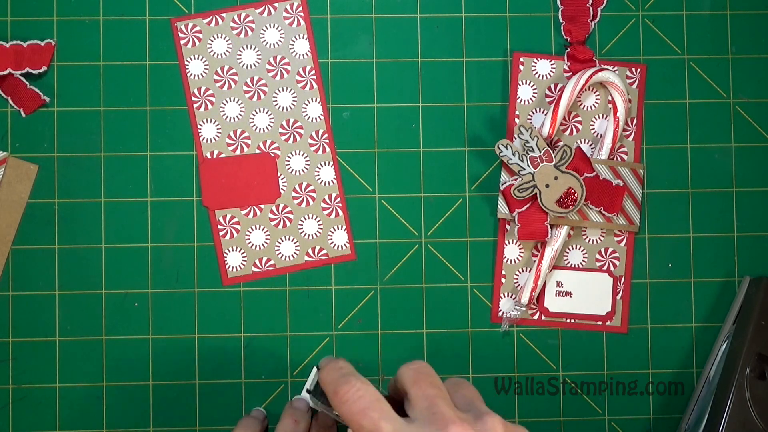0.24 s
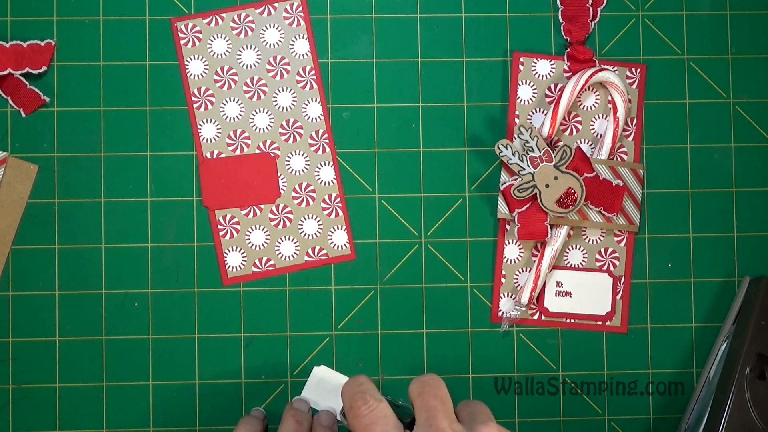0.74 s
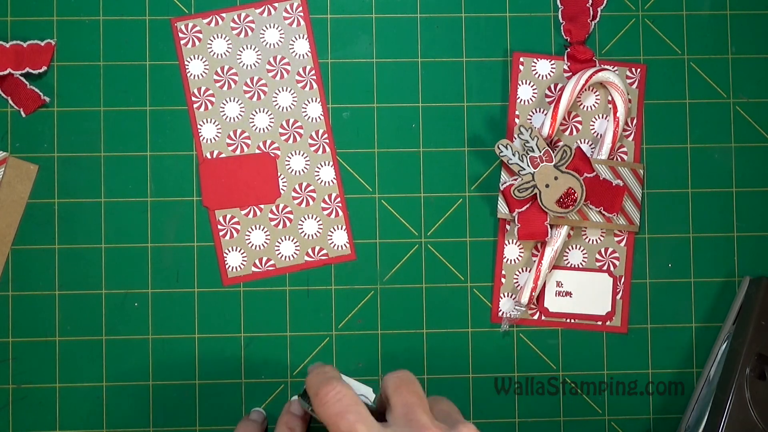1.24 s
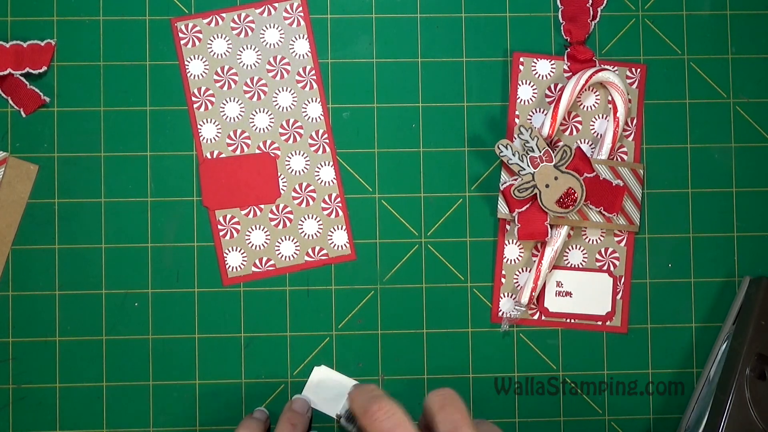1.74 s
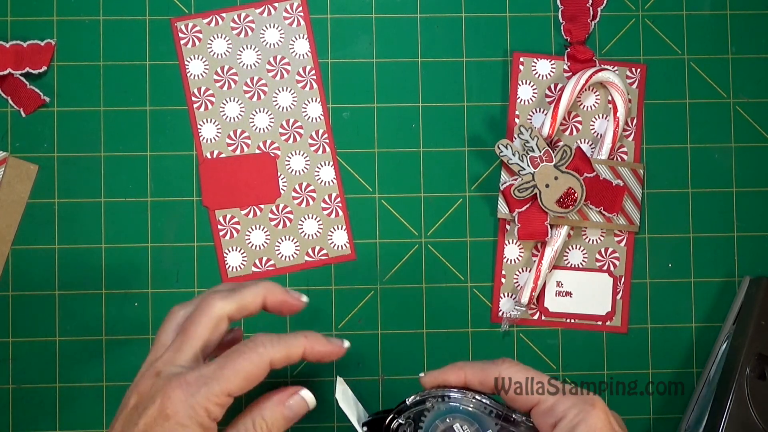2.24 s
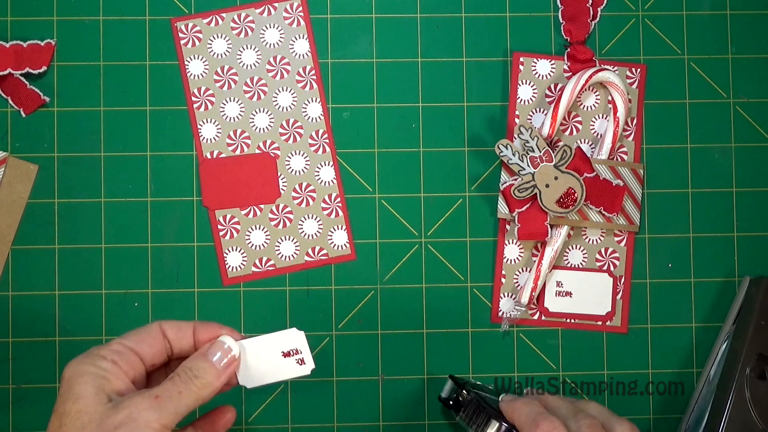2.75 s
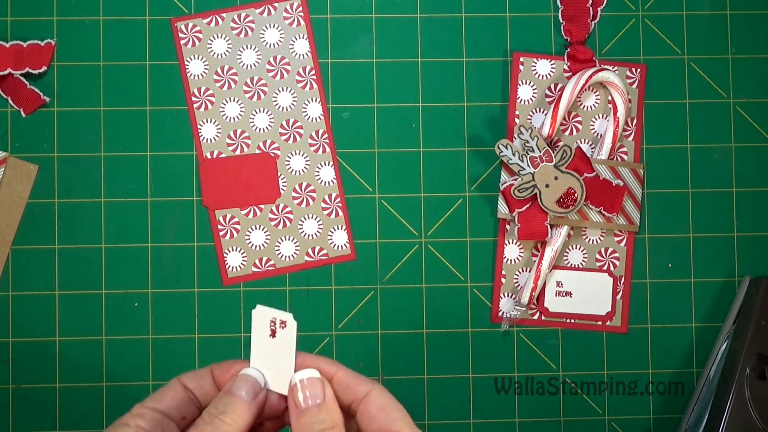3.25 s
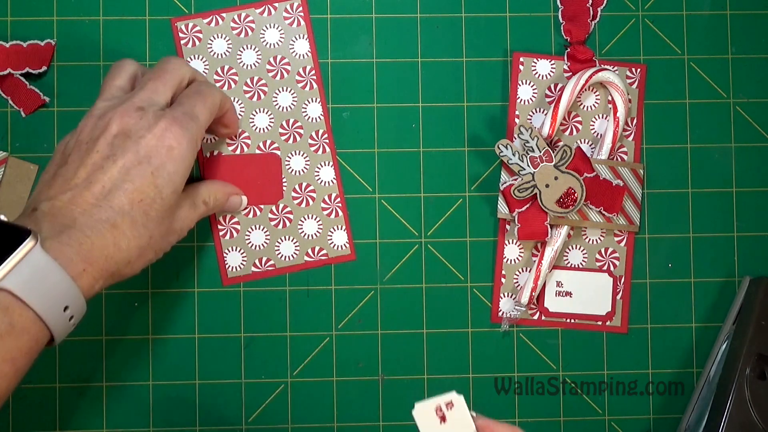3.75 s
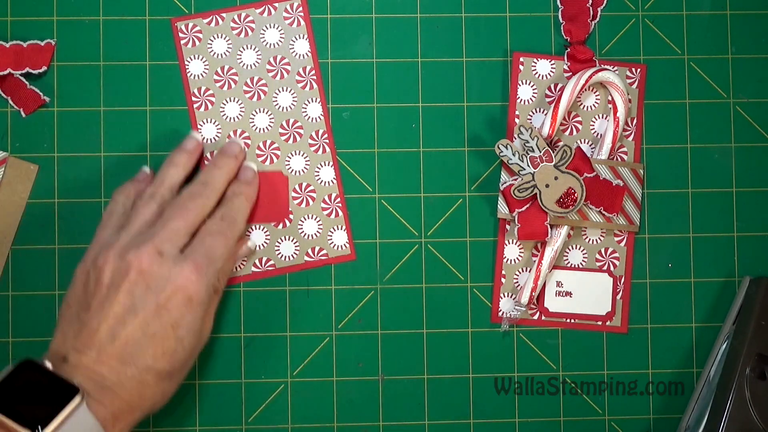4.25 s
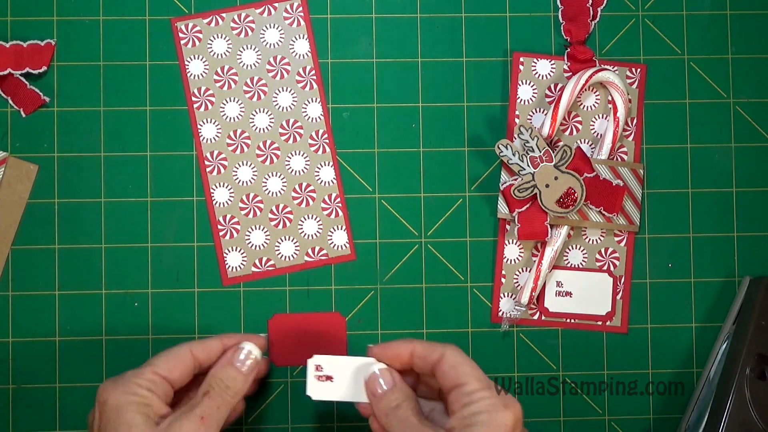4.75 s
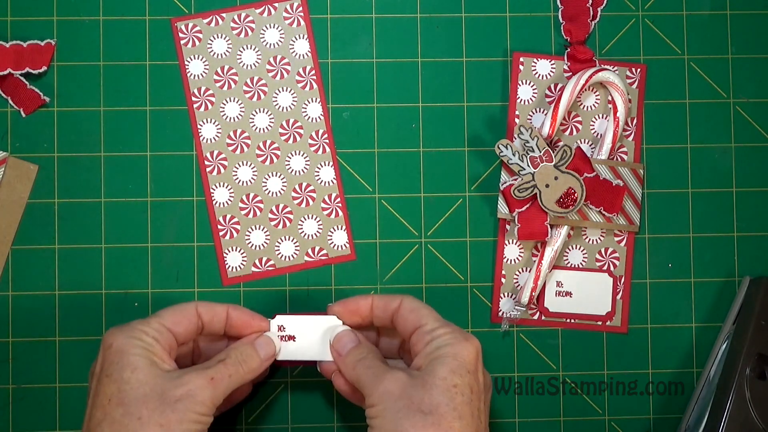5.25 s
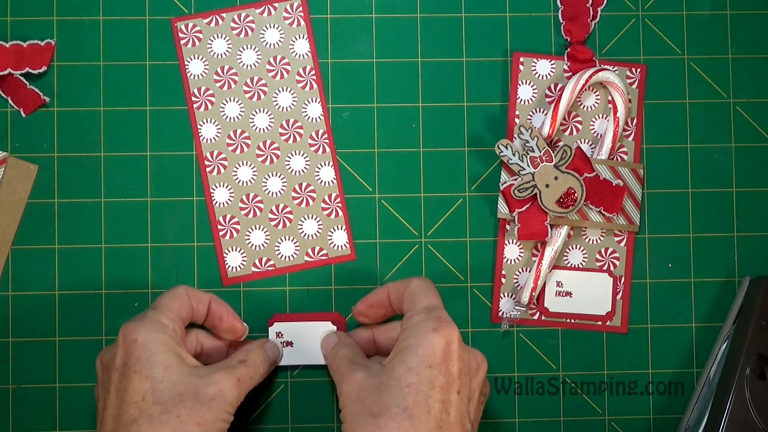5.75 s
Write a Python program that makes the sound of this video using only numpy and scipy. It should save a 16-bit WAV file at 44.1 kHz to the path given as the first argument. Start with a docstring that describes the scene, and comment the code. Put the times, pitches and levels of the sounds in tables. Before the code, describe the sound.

Close up at a craft table, a plastic tape runner clicks, gives two very short ratcheting rasps, the second faster, then rattles sharply as it is handled and laid down. Afterwards fingertips tap, cardstock hisses briefly over the mat, and small card edges tick. Small room with low noise and hum, close stereo microphone, loudest clicks clipped.

```python
"""A plastic tape runner is drawn twice over a small card tag, its ratchet rasping faster as the hand speeds up;
laid down, it rattles on the craft table. Fingers tap, slide cardstock over the mat and press the tag onto it.
Contacts are noise bursts through body resonances, blows are decaying sines, rubs are filtered noise.
All is heard close up in stereo, the loudest clicks clipped; behind lies a small room with noise, hum and a faint warble."""
import sys
import numpy as np
from scipy import signal
from scipy.fft import rfft, irfft
from scipy.io import wavfile
from scipy.ndimage import uniform_filter1d

SR = 44100
rng = np.random.default_rng(int(sys.argv[2]) if len(sys.argv) > 2 else 0)


def unload_audio(sound):
    """Save the sound as a 16-bit wav file, at the path given as the first command line argument."""
    columns = np.transpose(np.atleast_2d(sound))
    # keep every value between -1 and 1, then stretch to whole-number steps
    steps = np.round(np.clip(columns, -1, 1) * 32767)
    wavfile.write(sys.argv[1], SR, steps.astype(np.int16))


N = 264226
T = np.arange(N) / SR

# Levels of clicks and blows are before the gain of their layer; tilts count from 1 kHz up.
# Clear clicks and knocks of the runner's case:
# (time [s], level [dB], chatter length [s], tilt [dB per octave], struck band [Hz])
CASE_CLICKS = [(0.1202, -20, 0.0063, -1.5, 3220), (0.4306, -9.5, 0.007, -0.5, 1730),
               (0.4394, -3.5, 0.0041, 1, 5050), (0.5366, -16, 0.0047, -2.5, 6060),
               (0.569, -8.5, 0.0026, -3, 5100), (0.907, -24, 0.0021, 7, 1510),
               (0.9233, -4.5, 0.0026, 8, 1560), (1.0616, -9, 0.0044, 3, 4370),
               (1.131, -19, 0.0042, -4, 3120), (1.224, -23, 0.016, -0.5, 1980),
               (1.3183, -11.5, 0.0052, 3.5, 4370), (1.3241, -6, 0.0036, 1, 4470),
               (1.7836, -22, 0.004, -1, 12210), (1.8324, -19.5, 0.0062, 4, 1820),
               (1.8486, 0.5, 0.0022, 8.5, 1480), (1.874, -23.5, 0.015, -9.5, 2450),
               (1.9157, -19, 0.0075, -2, 5070), (2.3294, -19, 0.0031, 0.5, 2760),
               (2.478, 1, 0.0026, 4.5, 2650), (2.496, -13, 0.01, -2, 7600),
               (2.671, -20.5, 0.0054, -0.5, 4350), (2.702, 0.5, 0.0024, 0, 10000),
               (2.801, -6.5, 0.0017, 3, 6660), (2.844, 1, 0.0065, -1.5, 11200),
               (2.921, 1, 0.0067, -2, 10900), (2.936, -5.5, 0.0073, 0, 4370),
               (3.0163, 4.5, 0.0032, 0, 1790), (3.051, -13.5, 0.0083, -2.5, 4640),
               (3.115, -16.5, 0.008, 0, 2010), (3.1747, -10, 0.0023, -8.5, 3600),
               (3.1794, 2.5, 0.0047, 0.3, 4000), (3.2643, 0, 0.0055, -0.5, 1880),
               (3.308, -13.5, 0.0063, 0, 2180), (3.3375, -9, 0.0062, -1.5, 10900),
               (3.377, -19, 0.0034, 3, 2000), (3.385, -12, 0.011, -0.5, 1930),
               (3.425, -16.5, 0.0074, 2, 1900), (3.481, -11, 0.0067, -1, 1900),
               (3.501, -20, 0.008, -2, 2580)]
# Fingernails and card edges: (time [s], level [dB], chatter length [s], tilt [dB per octave], struck band [Hz])
CARD_TICKS = [(3.7773, -15.5, 0.0032, 5, 1320), (3.8984, -19, 0.0023, 1, 1400),
              (4.1792, -27.5, 0.0033, 4.5, 1520), (4.2296, -30, 0.0065, 9, 1530),
              (4.767, -12, 0.0022, 0, 1710), (4.9877, -17, 0.0021, 2.5, 3400),
              (5.0829, -15.5, 0.0032, 1, 2700), (5.0916, -23, 0.0052, 1, 6770),
              (5.1659, -14, 0.0047, 2, 3340), (5.182, -18, 0.0021, 3.5, 2570),
              (5.295, -25.5, 0.0032, -0.5, 2600), (5.5018, -23, 0.0037, 6, 2800)]
# Blows that reach the table top; low thud for a fingertip, high for plastic:
# (time [s], level [dB], thud pitch [Hz])
TABLE_BLOWS = [(0.432, -5, 234), (1.322, -11.5, 240), (1.784, -9.5, 282), (2.845, -7.5, 285),
               (2.92, -8.5, 260), (2.937, -13, 285), (3.018, -15.5, 231), (3.049, -16.5, 287),
               (3.179, -12, 123), (3.338, -16.5, 540), (3.776, -12, 124), (3.899, -20, 120),
               (4.181, -15, 116), (4.767, -15, 298)]
# Table top modes, before scatter from blow to blow: (frequency [Hz], level [dB], decay by 60 dB [s])
TABLE_MODES = [(90, -31, 0.12), (130, 4, 0.079), (175.6, -1, 0.24), (234.8, 2.5, 0.13), (290, 1, 0.087),
               (390, -6, 0.19), (504, -19, 0.092), (599, -3.5, 0.061)]
# Speed of the card pushed over the mat, given as loudness: (time [s], level [dB])
CARD_SPEED = [(4.28, -57), (4.294, -27), (4.338, -18), (4.46, -19), (4.536, -11), (4.572, -17.5),
              (4.61, -17.5), (4.66, -44)]
# Light brushes and scuffs of skin, card and plastic: (time [s], length [s], level [dB], centre [Hz])
BRUSHES = [(0.029, 0.061, -31.5, 9200), (0.585, 0.0078, -17, 10000), (0.648, 0.017, -10.5, 10000),
           (1.13, 0.093, -37, 8800), (1.105, 0.15, -36.5, 517), (2.895, 0.066, -21.5, 8000),
           (3.114, 0.054, -27, 1960), (3.845, 0.09, -35.5, 1400), (4.768, 0.062, -23.5, 1840),
           (4.77, 0.031, -25.5, 517), (5.058, 0.019, -28.5, 6740), (5.216, 0.056, -33.5, 7500),
           (5.439, 0.05, -35, 8600)]
# Ratchet spectrum: (frequency [Hz], level [dB])
RATCHET_COLOUR = [(50, -44), (200, -23), (800, -26.5), (1200, -11.5), (1650, -5), (2400, -10.5), (3500, -3),
                  (5200, -1), (6600, -2), (9000, 0.5), (12000, -5), (16000, -14)]
# Case spectrum: (frequency [Hz], level [dB])
CASE_COLOUR = [(50, -28), (220, -9.5), (800, -13.5), (1250, -7.5), (1800, 0), (2500, -3.5), (3500, -1.5),
               (5500, -5), (8000, 3), (10200, 3), (12000, -8.5), (16000, -22)]
# Card spectrum: (frequency [Hz], level [dB])
CARD_COLOUR = [(50, -28), (200, -13), (800, -3.5), (1600, 5), (2700, -3), (4500, -7.5), (7000, -0.5),
               (10000, -4), (16000, -28)]
# Spectrum of card rubbing the mat: (frequency [Hz], level [dB])
MAT_COLOUR = [(530, -33), (900, -22), (1390, -20.5), (1740, -3.5), (1990, -16), (2360, -21), (3380, -12.5),
              (4010, -16), (6030, -9), (6800, -9), (7580, -4.5), (9200, -2), (13400, -13.5), (16000, -28)]
# Room noise spectrum: (frequency [Hz], level [dB])
ROOM_COLOUR = [(25, -7.5), (45, -2.5), (90, -2), (150, 1), (256, -3.5), (373, -2), (700, -6.5),
               (1190, -8.5), (1560, -7.5), (2350, -12.5), (2900, -13), (4000, -16), (14400, -21),
               (16000, -29)]
# Resonances of the runner's shell: (frequency [Hz], width [Hz], level [dB])
SHELL_MODES = [(1640, 145, 6), (2062, 45, 4), (2960, 70, 4), (3720, 82, 5), (4490, 220, 2),
               (5130, 580, 4.5), (9230, 270, 4)]
# Room noise before its flicker: (time [s], level [dB])
ROOM_LEVEL = [(0, -35), (0.4, -35.5), (0.9, -37.5), (2.03, -37.5), (2.4, -33.5), (3.65, -38.5),
              (4.2, -36.5), (5.99, -32)]
# Mains hum before its slow drift in pitch: (frequency [Hz], level [dB])
HUM = [(59.6, -58), (119.5, -53), (178.5, -50.5)]
# Strokes of the runner: (start [s], tooth rate at the start [Hz], at full speed [Hz], while braking [Hz],
# level [dB], fade over the stroke [dB], first struck band [Hz], last struck band [Hz])
STROKES = [(0.5749, 50.16, 55.3, 46.5, -3.5, -0.7, 3600, 4560),
           (1.5274, 63.35, 91, 53.5, -4, -2, 6700, 2600)]
# Spells when the hand shifts its grip and loose parts tick: (start [s], end [s], level [dB])
HANDLING = [(0.822, 1.25, -31.5), (1.834, 1.92, -16), (2.127, 2.22, -29), (2.529, 2.83, -24),
            (2.848, 3.54, -22.5)]


def undb(db):
    """Decibels to gain."""
    return 10 ** (np.asarray(db) / 20)


def curve(rows):
    """Gain along a (time [s], level [dB]) curve."""
    return undb(np.interp(T, *np.transpose(rows)))


def unit(x):
    """Scale to rms 1."""
    return x / np.sqrt(np.mean(x ** 2))


def freqs(x):
    """Frequencies of the spectrum of x, at least 1 Hz."""
    return np.maximum(np.fft.rfftfreq(x.shape[-1], 1 / SR), 1)


def colour(f, points):
    """Level in dB at f, on straight lines over a log-frequency axis."""
    hz, db = np.transpose(points)
    return np.interp(np.log(f), np.log(hz), db)


def bump(f, hz, width):
    """Bell of height 1 around a resonance."""
    return 1 / (1 + (2 * (f - hz) / width) ** 2)


def ring(x, db):
    """Causal minimum-phase filter with the given dB at each frequency."""
    cepstrum = irfft(db * np.log(10) / 20, len(x))
    # folding the cepstrum forward makes the filter ring only after the blow
    cepstrum[1:len(x) // 2] *= 2
    cepstrum[len(x) // 2 + 1:] = 0
    return irfft(rfft(x) * np.exp(rfft(cepstrum)), len(x))


def add(out, s, x):
    """Mix x into out at time s."""
    i = max(int(s * SR), 0)
    out[i:i + len(x)] += x[:N - i]


def walk(rate):
    """Smooth random drift with a spread near 1 and the given number of knots per second."""
    knots = np.arange(0, T[-1] + 1, 1 / rate)
    return 1.22 * np.interp(T, knots, rng.standard_normal(len(knots)))


def spread(mid, side, points):
    """Left and right from a middle signal and an unrelated one, weighted by (frequency [Hz], level [dB])."""
    side = irfft(rfft(side) * undb(colour(freqs(side), points)), len(side))
    return np.array([mid + side, mid - side])


def background(flicker_db=1.4):
    """Flickering room noise, widest in the middle register, with mains hum that drifts slightly in pitch."""
    shape = colour(freqs(T), ROOM_COLOUR)
    mid, side = (unit(ring(rng.standard_normal(N), shape)) for _ in range(2))
    width = [(60, -27.0), (150, -15.5), (280, -10.5), (500, -5.5), (1200, -3.5), (4000, -4.5), (12000, -45.0)]
    air = spread(mid, side, width) * curve(ROOM_LEVEL) * undb(flicker_db * walk(22.036))
    hum = 0
    for hz, db in HUM:
        turns = np.cumsum(hz * (1 + 0.0041 * walk(2.88))) / SR
        hum = hum + undb(db) * np.sqrt(2) * np.sin(2 * np.pi * turns)
    return air + hum


def whine(rate_hz=28.0, low_hz=2580, high_hz=3060, tone_hz=2985, peak_s=5.5, slope_db_per_s=4.5):
    """A thin tone, joined by an upward chirp about 28 times a second; both slowly swell and sink."""
    tone_db, warble_db = -47, -42.5  # at their loudest
    tone_start_s, warble_start_s, fade_s = 3.66, 3.94, 0.15
    swell = undb(-slope_db_per_s * np.abs(T - peak_s))
    tone_gain = undb(tone_db) * np.clip((T - tone_start_s) / fade_s, 0, 1)
    chirp_gain = undb(warble_db) * np.clip((T - warble_start_s) / fade_s, 0, 1)
    turn = np.cumsum(rate_hz * (1 + .01 * walk(5.2))) / SR % 1
    # the pitch climbs in the middle third of each turn
    hz = low_hz + (high_hz - low_hz) * np.clip(3 * turn - 1, 0, 1) + 75 * walk(400)
    pulse = np.sin(np.pi * turn) ** 4 * undb(walk(200))
    chirp = np.sin(2 * np.pi * np.cumsum(hz) / SR) * pulse
    tone = np.sin(2 * np.pi * np.cumsum(tone_hz + 12 * walk(60)) / SR)
    return swell * (chirp_gain * unit(chirp) + tone_gain * unit(tone))


def room(x, early_db=-13, early_s=0.0082, late_db=-14, t60_s=0.52, treble_t60_s=0.16, size=24000):
    """Quick reflections off the desk, then the short tail of a small room, its treble dying first."""
    t = np.arange(size) / SR
    dull = 1 / (1 + (freqs(t) / 4200) ** 2)
    responses = []
    for noise in rng.standard_normal((2, size)):
        low = irfft(rfft(noise) * dull, size)
        early = noise * np.exp(-t / early_s) * (t > .002)
        low_tail = low * np.exp(-np.log(1000) * t / t60_s)
        treble_tail = (noise - low) * np.exp(-np.log(1000) * t / treble_t60_s)
        late = (low_tail + treble_tail) * np.clip(t / 0.024, 0, 1)
        early = undb(early_db) * early / np.linalg.norm(early)
        responses.append(early + undb(late_db) * late / np.linalg.norm(late))
    width = [(100, -42), (250, -68), (500, -29), (1500, -11), (4000, -13.5), (10000, -40)]
    pair = spread(*responses, width)
    return x + signal.fftconvolve(x[None], pair, axes=1)[:, :N]


def treble_width(x, width_s=4.5e-6):
    """A slight left-right difference in near sound that grows toward the treble."""
    side = np.gradient(x) * SR * width_s / 2
    return np.array([side, -side])


def brushes(rough_db=2, focus_db=14, focus=0.12, size=16384):
    """Short uneven rubs of noise, each with one broad resonance."""
    out, t = np.zeros(N), np.arange(size) / SR
    f = freqs(t)
    for s, length, db, hz in BRUSHES:
        friction = rng.standard_normal(size) * undb(rough_db * np.tanh(walk(439)[:size]))
        edges = 10 * np.log10((1 + (f / hz / 2) ** 3) * (1 + (150 / f) ** 4))
        rub = unit(ring(friction, focus_db * bump(f, hz, focus * hz + 600) - edges))
        stroke = np.sqrt(np.abs(np.sin(np.pi * np.minimum(t / length, 1))))
        add(out, s, undb(db) * rub * stroke)
    return out


def slide(rough_db=1.0, squeak_db=5, squeak_hz=8700):
    """Card fibres hiss over the mat; the faster they go, the more one band sings."""
    speed = curve(CARD_SPEED)
    friction = rng.standard_normal(N) * undb(rough_db * walk(220))
    f = freqs(friction)
    mat = colour(f, MAT_COLOUR)
    band = bump(f, squeak_hz, 2400)
    slow = unit(ring(friction, mat - 5 * band - 3 * bump(f, 1720, 500)))
    fast = unit(ring(friction, mat + squeak_db * band))
    share = speed / speed.max()
    moving = (T > CARD_SPEED[0][0]) & (T < CARD_SPEED[-1][0])
    return moving * speed * ((1 - share) * slow + share * fast)


def table(gain_db=-9, thud_s=0.0061, modes_db=-3, shudder_db=-14, shudder_s=0.043, size=16384):
    """Blows through the mat: a dull thud, the table's modes near its pitch, and a shudder of loose things."""
    out, t = np.zeros(N), np.arange(size) / SR
    for s, db, thud_hz in TABLE_BLOWS:
        modes = 0
        scatter = rng.standard_normal((len(TABLE_MODES), 2))
        for (hz, mode_db, t60), (a, b) in zip(TABLE_MODES, scatter):
            strength = undb(mode_db + a) * bump(np.log2(hz), np.log2(thud_hz), 2.95)  # width in octaves
            tone = np.sin(2 * np.pi * hz * (1 + 0.005 * b) * t)
            modes = modes + strength * tone * np.exp(-np.log(1000) * t / t60)
        thud = np.sin(2 * np.pi * thud_hz * t) * np.exp(-t / thud_s)
        dull = -10 * np.log10(1 + (freqs(t) / (2 * thud_hz)) ** 4)
        shudder = unit(ring(rng.standard_normal(size), dull)) * np.exp(-t / shudder_s)
        onset = 1 - np.exp(-t / 0.0011)
        after = (undb(modes_db) * modes + undb(shudder_db) * shudder) * onset
        add(out, s, undb(db + gain_db) * (thud + after))
    return signal.sosfilt(signal.butter(4, 68, "high", fs=SR, output="sos"), out)


def clicks(rows, points, modes, ring_db, grain_db, tail_db, tail_s, gain_db, tick_db,
           edge=2, rise_s=0.00028, snap=.75, size=8192):
    """Each contact chatters for a few ms (a higher edge ends it more abruptly); the whole body buzzes on briefly."""
    out, t = np.zeros(N), np.arange(size) / SR
    f = freqs(t)
    body = colour(f, points) + sum(db * bump(f, hz, width) for hz, width, db in modes)
    lowpass = signal.butter(2, 7000, fs=SR, output="sos")
    for s, db, length, tilt, hz in rows:
        noise, grain, buzz = rng.standard_normal((3, size))
        chatter = noise * undb(grain_db * np.tanh(unit(uniform_filter1d(grain, size=24))))
        contact = np.exp(-(t / length) ** edge) * (1 - np.exp(-t / rise_s))
        # the treble is spent in the first snap
        dull = signal.sosfilt(lowpass, chatter)
        bright = (chatter - dull) * np.exp(-(t / (snap * length)) ** 2)
        force = (dull + bright) * contact
        # the hardest impact is a single sharp tick
        force[np.argmax(contact) // 2] += undb(tick_db) * np.linalg.norm(force)
        # where the body is struck decides its brightness and which band rings most
        spot = tilt * np.log2(np.maximum(f, 1000) / 1000) + ring_db * bump(f, hz, hz / 4)
        strike = ring(force, body + spot)
        strike *= np.linalg.norm(contact) / np.linalg.norm(strike)
        # loose parts keep rattling unevenly, with less of the struck spot's colour
        rattle = buzz * undb(1.6 * np.tanh(unit(uniform_filter1d(grain[::-1], size=110))))
        decay = np.exp(-t / tail_s) * (1 - np.exp(-t / length))
        tail = unit(ring(rattle, body + 0.25 * spot)) * undb(tail_db) * decay
        add(out, s, undb(db + gain_db) * (strike + tail))
    return out


def card():
    """Fingernails and card edges tick: short contacts on a body without sharp resonances."""
    return clicks(CARD_TICKS, CARD_COLOUR, [], ring_db=13.5, grain_db=7, tail_db=-22, tail_s=0.0054,
                  gain_db=3, tick_db=-9.5, snap=1.6)


def loose_parts(per_s=22, scatter_db=2, length_s=0.0045, tilt_db=2, centre_hz=3400, count=28):
    """Faint ticks at uneven intervals while the runner is moved in the hand."""
    rows = []
    for start, end, db in HANDLING:
        gap, strength, pitch = rng.standard_normal((count, 3)).T
        gaps = np.exp(0.4 * gap) / per_s
        times = start + np.cumsum(gaps) - gaps[0] / 2
        for s, a, b in zip(times, strength, pitch):
            if s < end:
                rows.append((s, db + scatter_db * a, length_s, tilt_db, centre_hz * np.exp(0.57 * b)))
    return rows


def rebounds(delay_s=0.014, drop_db=-21, length_s=0.006, tilt_db=-6):
    """The case rebounds after each click, weaker and duller."""
    rows = []
    for (s, db, _, tilt, hz), a in zip(CASE_CLICKS, rng.standard_normal(len(CASE_CLICKS))):
        rows.append((s + delay_s * np.exp(0.1 * a), db + drop_db, length_s, tilt + tilt_db, hz))
    return rows


def case():
    """Knocks, rebounds and loose parts strike the plastic shell, which rings at its resonances."""
    return clicks(CASE_CLICKS + rebounds() + loose_parts(), CASE_COLOUR, SHELL_MODES,
                  ring_db=6.5, grain_db=9.0, tail_db=-20.0, tail_s=0.0094, gain_db=0.5, tick_db=-9.5,
                  edge=1.62, rise_s=0.00086, snap=1.28)


def teeth(count=9, chatter_s=0.0083, scatter_db=0.2, tilt_db=0.03, dulling=0.44):
    """Teeth pass faster as the hand speeds up, growing slightly softer and duller; the last comes late."""
    # dulling: dB per octave lost for each dB of fade
    rows, progress = [], np.linspace(0, 1, count)
    for start, first_hz, full_hz, braking_hz, db, fade_db, first_ring_hz, last_ring_hz in STROKES:
        gaps = np.append(np.linspace(1 / first_hz, 1 / full_hz, count - 2), 1 / braking_hz)
        times = start + np.append(0, np.cumsum(gaps))
        for s, u, (strength, length, pitch) in zip(times, progress, rng.standard_normal((count, 3))):
            ring_hz = first_ring_hz * (last_ring_hz / first_ring_hz) ** u * np.exp(0.15 * pitch)
            level = db + fade_db * u + scatter_db * strength
            tilt = tilt_db + dulling * fade_db * u
            rows.append((s, level, chatter_s * np.exp(0.1 * length), tilt, ring_hz))
    return rows


def ratchet():
    """Each tooth snaps past with a burst of chatter that the runner's shell colours."""
    return clicks(teeth(), RATCHET_COLOUR, SHELL_MODES, ring_db=4.5, grain_db=6.5, tail_db=-11.0, tail_s=0.012,
                  gain_db=-0.5, tick_db=-17.5, edge=3.8, rise_s=0.00042, snap=1.0)


def scene():
    """Runner, card and table heard close up, with the room behind."""
    near = ratchet() + case() + card() + table() + slide() + brushes()
    return room(near + whine()) + treble_width(near) + background()


def record(dry, balance_db=-0.04, ceiling=0.79, top_hz=16000):
    """The loudest clicks are clipped flat, and the top is cut."""
    balance = undb(np.array([[balance_db], [-balance_db]]) / 2)  # left, right
    clipped = np.clip(dry * balance, -ceiling, ceiling)
    return signal.sosfiltfilt(signal.ellip(8, .1, 50, top_hz, fs=SR, output="sos"), clipped)


dry = scene()
out = record(dry)
unload_audio(out)
```